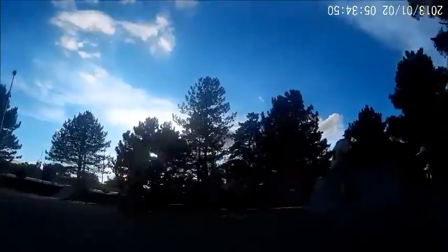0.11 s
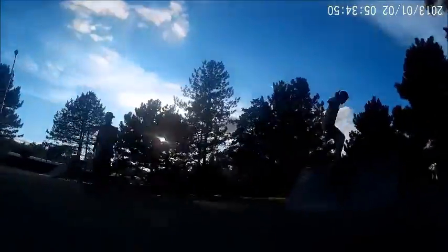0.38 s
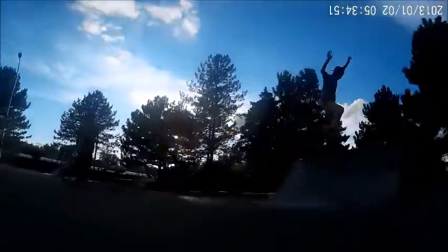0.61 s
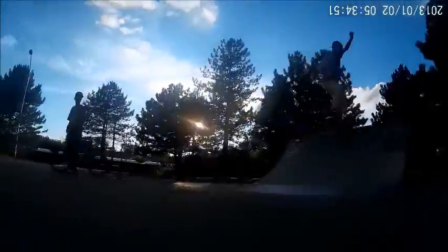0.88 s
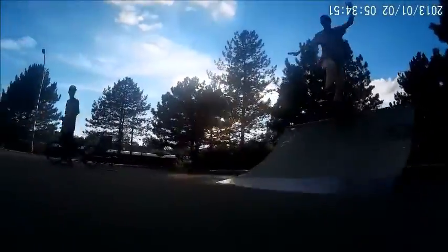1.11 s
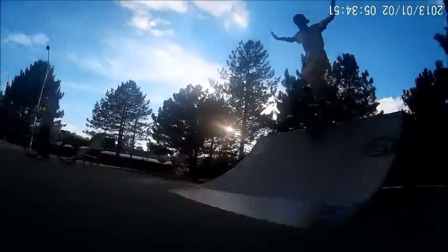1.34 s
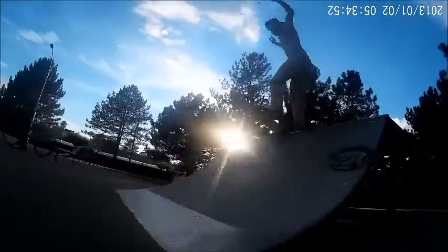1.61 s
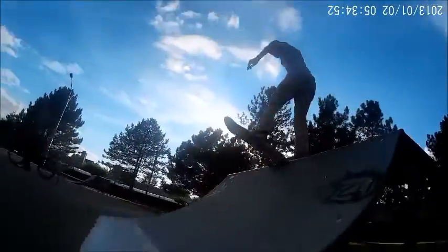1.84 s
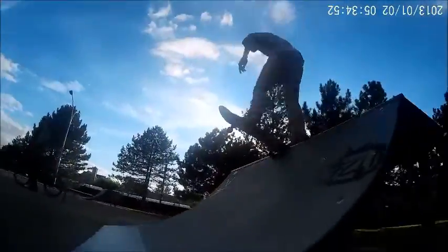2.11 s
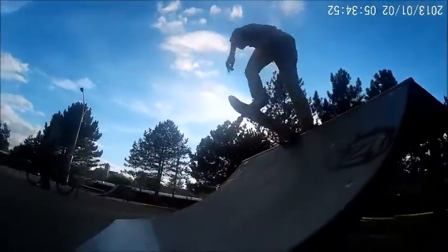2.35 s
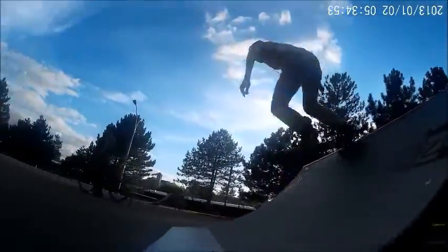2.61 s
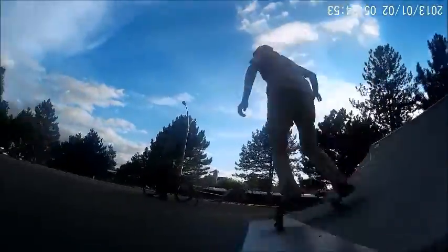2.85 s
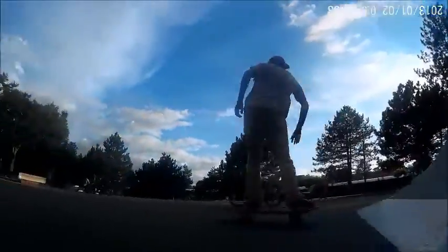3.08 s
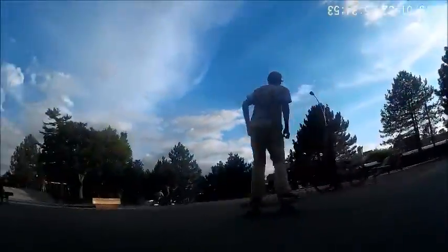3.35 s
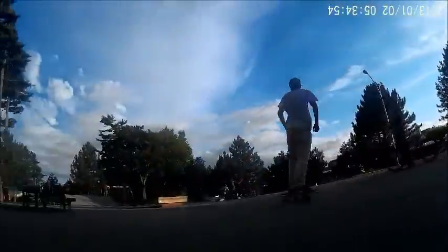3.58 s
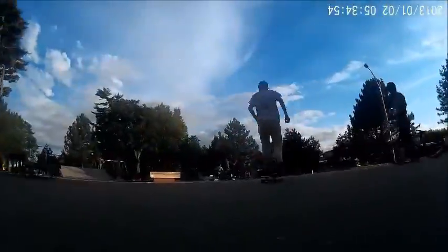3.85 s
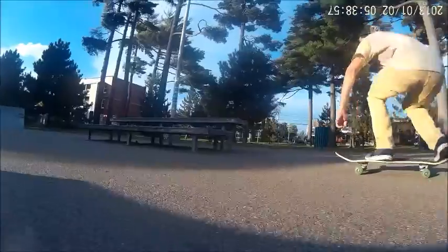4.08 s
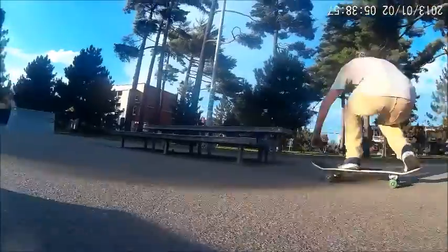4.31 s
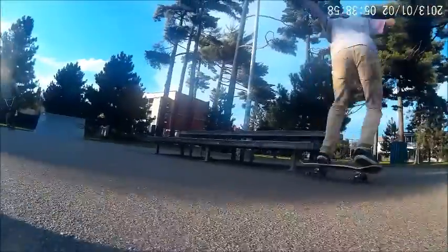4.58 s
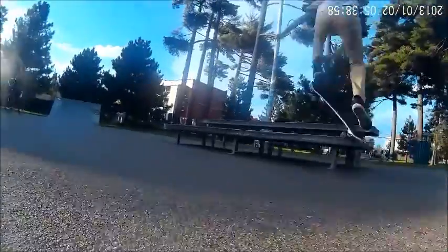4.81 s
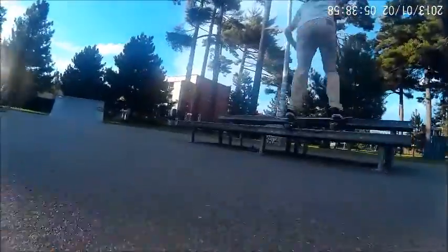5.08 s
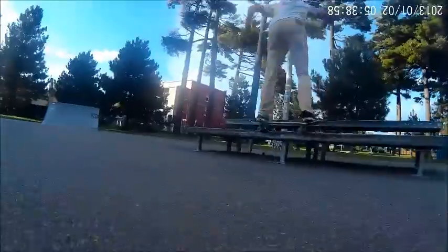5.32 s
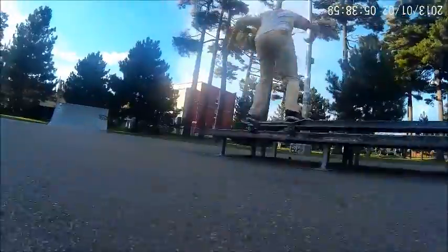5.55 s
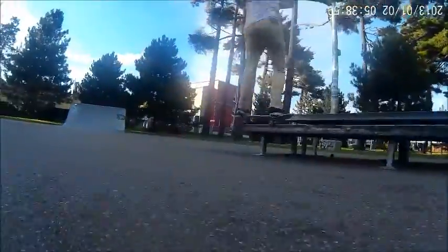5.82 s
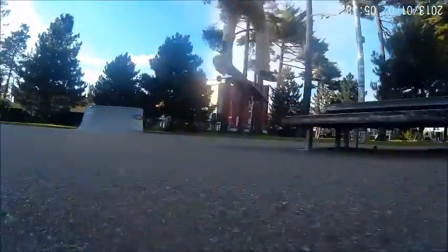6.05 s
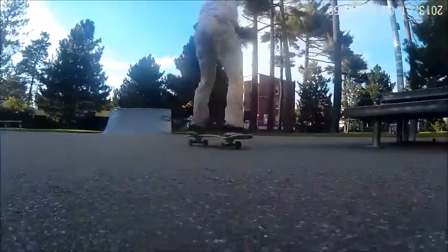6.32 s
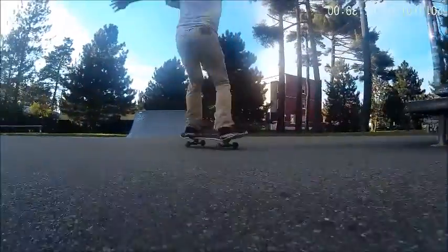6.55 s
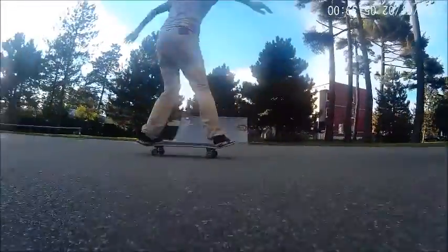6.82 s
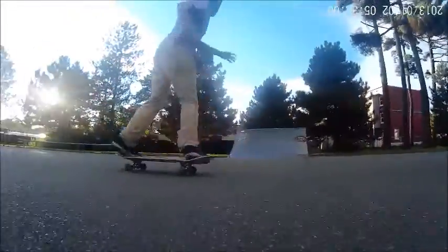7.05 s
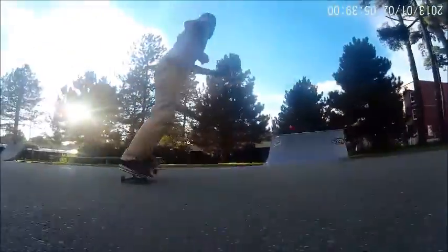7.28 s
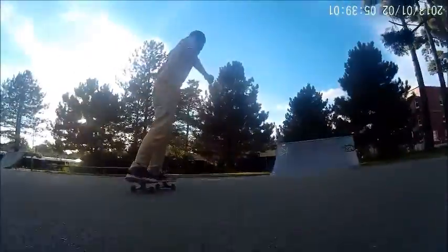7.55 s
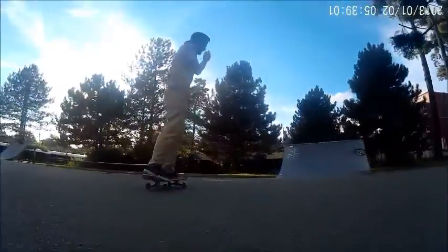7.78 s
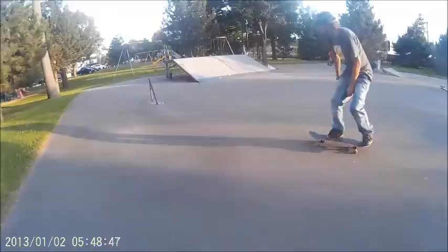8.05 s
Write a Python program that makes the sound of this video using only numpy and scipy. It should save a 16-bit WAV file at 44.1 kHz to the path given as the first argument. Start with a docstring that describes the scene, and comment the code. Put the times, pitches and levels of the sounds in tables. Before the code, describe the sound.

A small camera in a plastic housing gives everything a boxy, nasal ring, under steady hiss, light wind and a fuzzy low hum. From 0 to 1.2 s wheels roar over rough ground, strongest at first, with irregular clacks and thin singing bearings. A sharp crack at 1.24 s starts a harsher roll, peaking in a loud smack cluster at 1.6 s, then falling away by 1.8 s. Near quiet with a soft gust around 2 s. At 2.7 s light clatters resume over faint rolling, with one loud dry clack at 3.5 s and small rattles to 4.1 s. A second board rolls softly, pops at 4.75 s, and strikes a steel bench at 5.06 s with a short bright clank, another knock at 5.3 s. A faint metallic scrape lasts until 6.0 s. It lands at 6.37 s in a hard multiple slap, rolls quietly with occasional ticks, then gets louder from 7.8 s with loose clacks.

```python
"""Skateboards around a park

Wheels roll over asphalt and a ramp, decks and trucks clack down; one board lands on a steel bench, slides
along it and drops back to the ground. Rolls and clacks are noise in layers, shaped by a small camera's plastic
housing with a strong ring near 1.3 kHz. Decks, bearings and bench are noise-driven resonances.
Ticks are short band bursts; wind and a fuzzy hum lie over the hiss of the camera's preamp."""
import sys
import numpy as np
from scipy import signal
from scipy.io import wavfile

SR = 44100
rng = np.random.default_rng(int(sys.argv[2]) if len(sys.argv) > 2 else 0)


def wav_record(signal):
    """Record a signal, one row per channel, as 16-bit PCM in the file named by sys.argv[1]."""
    frames = np.transpose(np.atleast_2d(signal))
    bounded = np.clip(frames, -1, 1)
    # unit amplitude maps onto the largest positive 16-bit level
    quanta = np.round(bounded * 32767).astype(np.int16)
    wavfile.write(sys.argv[1], SR, quanta)


def convert_level_to_amplitude(level_db):
    """Map a level in decibels to its linear amplitude factor."""
    exponent = np.asarray(level_db, float) / 20
    return 10 ** exponent


N = 359856  # length in samples


def evened(x):
    """Bring a signal to rms 1."""
    return x / np.sqrt(np.mean(x ** 2) + 1e-20)


def curve(rows):
    """Read the columns of a table at every sample; silent (-150 dB) outside its times."""
    time_s, *columns = np.transpose(rows)
    return [np.interp(np.arange(N) / SR, time_s, column, -150, -150) for column in columns]


def read(points, hz):
    """Draw a tone curve through (Hz, dB) points, straight over log frequency."""
    point_hz, db = np.transpose(points)
    return np.interp(np.log(hz + 1), np.log(point_hz + 1), db)


def causal(db):
    """Turn a gain curve into a minimum-phase impulse response of energy 1, its sound as early as possible."""
    both_sides_db = np.concatenate([db, db[-2:0:-1]])
    log_gain = np.log(convert_level_to_amplitude(np.maximum(both_sides_db, -140)))
    minimum_phase = np.exp(np.conj(signal.hilbert(log_gain)))
    taps = np.fft.ifft(minimum_phase).real[:2048]
    return taps / np.linalg.norm(taps)


def noise():
    """White noise over the whole scene."""
    return rng.standard_normal(N)


def filtered(x, order, hz, kind="low"):
    """Butterworth filter, low-pass unless a band is asked for."""
    return signal.sosfilt(signal.butter(order, hz, kind, fs=SR, output="sos"), x)


def slow(hz):
    """Smooth random drift up to hz, rms 1."""
    return evened(filtered(noise(), 2, hz))


def resonate(x, hz, width_hz):
    """Ring one resonance."""
    return signal.lfilter(*signal.iirpeak(hz, hz / width_hz, SR), x)


def add(mix, start_s, sound):
    """Lay a sound into the mix, cut off at the end of the scene."""
    part = mix[round(start_s * SR):][:len(sound)]
    part += sound[:len(part)]


# Tone of the housing wall, relative: hz, level_db
WALL_TONE = [(100, -24), (250, -18), (600, -18.5), (1000, -18.5), (1350, -15), (1600, -18.5), (2100, -12),
             (2400, -29.5), (3400, -29.5), (4400, -32.5), (5300, -43), (6800, -49.5), (8500, -54.5),
             (13000, -73.5)]
# Resonances of the housing, with a few dips: pitch_hz, width_hz, above_wall_db
HOUSING_MODES = [(249, 166.5, 6.5), (486.3, 49, 6), (620, 220, 6), (833, 23.3, 3.5), (1325.3, 187, 11),
                 (1189, 300, 3), (1746.7, 84, 9), (1880.3, 72, 7.5), (1962.3, 193, 6.5), (2530, 460, 0.5),
                 (2763, 55, 3.5), (3096, 94, 5), (3511.1, 186, -11), (3519, 34, 12), (3700, 130, -2),
                 (3921, 62, 6.5), (4227, 38, 6.5), (4780, 80, 4.5), (7586, 170, 10.5), (9000, 240, 4.5),
                 (9525, 46, 11), (11000, 590, 4.5)]


def housing():
    """The way through the plastic to the microphone, split into five bands so each layer has its own level."""
    hz = np.fft.rfftfreq(8192, 1 / SR)
    db = read(WALL_TONE, hz)
    for pitch_hz, width_hz, above_wall_db in HOUSING_MODES:
        db = db + above_wall_db / (1 + (2 * (hz - pitch_hz) / width_hz) ** 2)
    edges_hz = 390, 850, 1600, 2350
    under = [-10 * np.log10(1 + (hz / edge) ** 12) for edge in edges_hz]
    over = [-10 * np.log10(1 + (edge / (hz + 1)) ** 12) for edge in edges_hz]
    main_ring = under[2] + over[1]
    low = under[1] + over[0]
    high, lowest = over[3], under[0]
    above_ring = under[3] + over[2]
    return [causal(db + band) for band in (main_ring, low, high, lowest, above_ring)]


# Wheels on the ground, one list per stretch of riding: time_s, roll_db, ground_coarseness_db
ROLL_STRETCHES = [
    [(0.0, -22, 1.5), (0.074, -27.5, 2), (0.338, -33, 0), (0.778, -31.5, -2), (0.988, -33, 1),
     (1.098, -31, 1.5), (1.228, -34.5, 2.5)],
    [(1.234, -29.5, 1.5), (1.454, -29, 2), (1.61, -22.5, -2), (1.74, -32.5, 2), (1.775, -41, 2)],
    [(1.785, -54.5, 0.5), (1.963, -58.5, 0.5), (2.125, -61, 0), (2.72, -61.5, -0.5)],
    [(2.76, -49.5, -0.5), (2.882, -56.5, 4), (3.074, -42.5, 0), (3.264, -45, -1.5), (3.49, -48, -1),
     (3.52, -31, -1), (3.57, -36, -1), (3.61, -39, -1), (3.64, -50, -5), (3.814, -52, 0.5),
     (3.95, -52.5, -1.5), (4.03, -42.5, 0), (4.105, -39.5, 1)],
    [(4.115, -47.5, -1.5), (4.2, -47.5, -2), (4.24, -52.5, -2.5), (4.39, -47.5, -2.5), (4.608, -42.5, 2),
     (4.784, -54.5, -2), (5.036, -51.5, 2), (5.228, -46.5, -2), (5.46, -48.5, -1.5), (5.78, -47.5, -0.5),
     (6.0, -52.5, -1.5)],
    [(6.02, -54, 0.5), (6.282, -54.5, 0.5), (6.452, -48, 0.5), (6.804, -48.5, 1), (7.018, -51, 2.5),
     (7.192, -38.5, 0), (7.292, -44, 2), (7.48, -49.5, 1.5), (7.694, -52, 0), (7.805, -45.5, -0.5)],
    [(7.82, -37.5, -7.5), (8.0, -37, 1.5), (8.112, -38, 4)],
    [(8.116, -40, 2), (8.16, -35.5, -2.5)],
]
# Board of each stretch, levels beside its roll: deck_rumble_db, grit_db, boom_db, rasp_db
BOARD_VOICES = [(-11.5, -22.5, -16, -9), (-14, -13.5, -22, -5.5), (-7.5, -25.5, -11, -8.5),
                (-9.5, -20.5, -11, -7), (-8.5, -19.5, -8, -6.5), (-8.5, -18, -8, -9),
                (-13.5, -22.5, -10.5, -21.5), (2.5, -20.5, -15.5, -14.5)]


def rolling():
    """Level of each layer in dB: all follow the roll and the ground, around the level of their board."""
    # rumble, grit, boom, rasp: dB for each dB of swell, and for each dB of coarseness
    per_swell, per_coarse = (0.738, 1.156, 0.593, 0.94), (0.3, 0.754, 0.1, 1.1983)
    roll_db, coarse_db = curve(sum(ROLL_STRETCHES, []))
    starts_s = [rows[0][0] for rows in ROLL_STRETCHES]
    stretch = np.searchsorted(starts_s, np.arange(N) / SR, "right") - 1
    usual_db = np.array([np.mean(rows, axis=0)[1] for rows in ROLL_STRETCHES])[stretch]
    swell_db = roll_db - usual_db
    levels_db = [roll_db]
    for voice_db, swell, coarse in zip(np.transpose(BOARD_VOICES), per_swell, per_coarse):
        levels_db.append(usual_db + voice_db[stretch] + swell * swell_db + coarse * coarse_db)
    return levels_db


def wheels(paths):
    """Stones of the asphalt knock the wheels: a lumpy noise patter with about 900 random knocks a second."""
    lumps_db = 1.44 * slow(hz=70) + 1.38 * slow(hz=8.8)
    knocked = rng.random(N) < 900 / SR
    size_db = 5.85 * np.minimum(rng.exponential(1, N), 4)
    stones = knocked * convert_level_to_amplitude(size_db) * rng.choice([-1, 1], N)
    patter = noise() + 0.158 * evened(stones)
    lump_shares = 0.639, 0.81, 1.48, 1.405, 0.9118
    out = np.zeros(N)
    for level_db, path, share in zip(rolling(), paths, lump_shares):
        own_waver_db = 1.243 * slow(hz=30)
        lumpy = evened(patter * convert_level_to_amplitude(share * lumps_db + own_waver_db))
        out += signal.oaconvolve(lumpy * convert_level_to_amplitude(level_db), path)[:N]
    return out


# Bending modes of a nearby deck while it rolls: start_s, end_s, pitch_hz, width_hz, beside_roll_db
DECK_DRONES = [(0, 1.23, 836, 119, -16.5), (2.9, 3.451, 478, 70, -12), (2.9, 3.452, 831, 80, -13.5),
               (4.114, 4.698, 620, 127, -8)]


def decks():
    """Rolling noise drones in the bending modes of a deck."""
    t = np.arange(N) / SR
    drone = np.zeros(N)
    for start_s, end_s, pitch_hz, width_hz, db in DECK_DRONES:
        rolls = (t > start_s) & (t < end_s)
        drone += convert_level_to_amplitude(db) * rolls * evened(resonate(noise(), pitch_hz, width_hz))
    return drone * convert_level_to_amplitude(rolling()[0] + 2.26 * slow(hz=30.1))


# Narrow bands of the nearest board's wheel bearings: pitch_hz, width_hz, level_db before the fader below
BEARING_BANDS = [(3110, 160, -66), (4292, 220, -69.5), (7470, 490, -80), (9465, 175, -84.5),
                 (10743, 1600, -80.5)]
# Fader of the bearing song: time_s, gain_db
BEARING_FADER = [(0, 3), (1.05, 0.5), (1.24, 8), (1.75, 5.5), (1.79, -24)]


def bearings():
    """Wheel bearings sing: noise in narrow resonances, each wavering by itself."""
    song = np.zeros(N)
    for pitch_hz, width_hz, db in BEARING_BANDS:
        band = resonate(resonate(noise(), pitch_hz, width_hz), pitch_hz, width_hz)
        song += convert_level_to_amplitude(db + 3 * slow(hz=12)) * evened(band)
    return song * convert_level_to_amplitude(curve(BEARING_FADER)[0])


# Gusts of wind: peak_s, level_db, time_to_fall_10_db_s
GUST_SWELLS = [(1.3, -56.5, 0.37), (2.7, -60.5, 0.32), (1.99, -49.5, 0.1646), (3.6, -54.5, 0.28),
               (4.06, -47.5, 0.13), (4.54, -55.5, 0.0079), (6.8, -53.5, 0.01)]


def blowing():
    """Wind gain: a steady breeze with gusts that rise and fall alike, added as power."""
    t = np.arange(N) / SR
    power = convert_level_to_amplitude(-68) ** 2  # breeze, dB
    for peak_s, db, fall_s in GUST_SWELLS:
        power = power + convert_level_to_amplitude(db - 10 * abs(t - peak_s) / fall_s) ** 2
    return np.sqrt(power)


# Fuzzy low hum: time_s, level_db
HUM_FADER = [(0.0, -55.5), (1.66, -62.5), (1.86, -78), (2.59, -78), (2.73, -48.5), (3.11, -71.5),
             (5.39, -55), (5.5, -66.5), (6.52, -51), (8.16, -55)]


def wind():
    """Lumpy low-passed pressure noise, a steady distant rumble, and a hum of noise in one broad resonance."""
    gusts = filtered(filtered(noise(), 1, [26, 48], "band"), 2, 90)
    rumble = filtered(noise(), 2, [35, 210], "band")
    rumble_db, hum_hz, hum_width_hz = -62.5, 133.7, 69.52
    hum = resonate(resonate(noise(), hum_hz, hum_width_hz), hum_hz, 2 * hum_width_hz)
    return blowing() * evened(gusts) + convert_level_to_amplitude(rumble_db) * evened(rumble) + convert_level_to_amplitude(curve(HUM_FADER)[0]) * evened(hum)


# Tone of the preamp hiss, relative: hz, level_db
HISS_TONE = [(200, -6), (1000, 0), (3000, 1), (6000, 0), (12000, -1), (15000, -1.5), (16500, -8)]


def preamp_hiss():
    """Electronic noise of the preamp, a little stronger at first."""
    hiss_db, stronger_by_db, stronger_until_s = -68.7, 1.8, 2.9
    tone = causal(read(HISS_TONE, np.fft.rfftfreq(8192, 1 / SR)))
    level_db = hiss_db + stronger_by_db * (np.arange(N) < stronger_until_s * SR)
    return convert_level_to_amplitude(level_db) * signal.oaconvolve(noise(), tone)[:N]


# Light first contacts, ticks of flung grit, short wheel squeaks, truck clatter and one dry click:
# start_s, peak_db, lowest_hz, highest_hz, length_s (fall to 1/e, before the band filter smears it)
TICK_EVENTS = [(0.033, -31.5, 2400, 4400, 0.0066), (0.108, -28, 2449, 4640, 0.00805),
               (0.437, -23, 1840, 2810, 0.00396), (0.437, -32, 2790, 4260, 0.002),
               (1.2354, -10.5, 800, 2150, 0.00122), (2.873, -59, 3580, 4100, 0.01063),
               (3.15, -46, 3792, 4990, 0.048), (3.185, -50.5, 3620, 5870, 0.00827),
               (3.506, -23.5, 487, 2083, 0.0068), (4.747, -42, 2300, 3100, 0.022),
               (5.053, -28, 900, 1595, 0.006), (5.062, -37, 2500, 5222, 0.055),
               (5.293, -42, 3736, 4060, 0.0273), (6.363, -29, 2200, 3600, 0.014),
               (8.049, -51.5, 4012, 4850, 0.011), (8.116, -37, 2000, 15570, 0.0000383)]


def ticks():
    """Short noise bursts in one band with a quick start: tiny contacts, and one dry click."""
    out, t = np.zeros(N), np.arange(SR // 8) / SR
    for start_s, peak_db, lowest_hz, highest_hz, length_s in TICK_EVENTS:
        grain = rng.standard_normal(len(t)) * np.exp(-(t / length_s) ** 2)
        burst = filtered(grain, 4, [lowest_hz, highest_hz], "band")
        add(out, start_s, convert_level_to_amplitude(peak_db) * burst / abs(burst).max())
    return out


# Clacks of wheels, tail and trucks: blow_s, main_layer_peak_db, weight_db, hardness_db, t60_s
CLACK_EVENTS = [(0.1119, -24.5, -10.5, 9, 0.036), (0.1919, -18, -4, 2, 0.0436),
                (0.3603, -20, -12.5, -11.5, 0.032), (0.4945, -30, 0.5, -13, 0.036),
                (0.5526, -20, -19.5, -13.5, 0.144), (0.7817, -33.5, -2.5, -4.5, 0.077),
                (0.8137, -18.5, -11.5, -1, 0.024), (1.002, -20, -13, -7.5, 0.058),
                (1.048, -22, -8.5, 6, 0.185), (1.2354, -17, -11, 9, 0.167),
                (1.2461, -16.5, -27.5, 8.5, 0.062), (1.2781, -20.5, -26, 12, 0.072),
                (1.555, -17, -14.5, -6.5, 0.03), (1.572, -20.5, -20.5, -5, 0.051),
                (1.6005, -9.5, -18, 6, 0.0445), (1.6261, -18.5, -20, -2, 0.04),
                (1.6476, -21.5, -20, -2.5, 0.05), (1.7486, -19, -17.5, 9.5, 0.0695),
                (2.6952, -32.5, -8.5, 1, 0.0594), (2.7318, -25.5, -4, 7.5, 0.034),
                (2.738, -24, -5, 6.5, 0.04), (2.7447, -29, -2.5, -15, 0.053), (2.8692, -35, -3, 1.5, 0.174),
                (2.9429, -31.5, -4.5, 3.5, 0.073), (3.0044, -31, -2, 6, 0.04),
                (3.0175, -34.5, -13.5, 9, 0.042), (3.1524, -30, -7, 4.5, 0.143),
                (3.5116, -8, -23, -14, 0.03), (3.5568, -33.5, -21.5, 1, 0.08),
                (3.6594, -32.5, -16, -10, 0.034), (3.6738, -28, -5, -1.5, 0.171),
                (3.7686, -30, -14, -1.5, 0.033), (4.0188, -33, -23, -7, 0.069),
                (4.057, -31, -20.5, -10, 0.07), (4.0925, -30, -11, -1, 0.041),
                (4.1846, -37, 0, -5.5, 0.063), (4.443, -33.5, -6, -3, 0.05),
                (4.497, -34.5, -15.5, -5, 0.065), (4.5487, -33.5, -3.5, 6.5, 0.038),
                (4.5992, -30.5, -11.5, 1.5, 0.037), (4.6427, -30.5, -14.5, -7.5, 0.04),
                (4.668, -33, -13.5, -5, 0.051), (4.7262, -36, -24, -10, 0.048),
                (4.7447, -26, -20.5, 5, 0.1007), (4.753, -24, -18, 2, 0.104), (5.0615, -15, -11, 4, 0.06),
                (5.0735, -22, -7.5, 15.5, 0.0992), (5.0892, -22.5, -18, 12, 0.054),
                (5.1056, -30.5, -1.5, 16, 0.126), (5.2894, -26.5, -10, 4.5, 0.077),
                (5.3454, -33.5, -3, 7, 0.095), (5.3732, -31.5, -6, 1.5, 0.091),
                (6.262, -32.5, -11, 5, 0.065), (6.294, -40, -9, 9.5, 0.077), (6.363, -14.5, -7, 4, 0.0263),
                (6.3675, -13, -7, 3.5, 0.04), (6.3814, -15.5, -3.5, -2.5, 0.033),
                (6.3895, -18, -9, -3.5, 0.067), (6.7804, -28, -16.5, 2.5, 0.02),
                (6.791, -31.5, -8, 5.5, 0.072), (7.1358, -29.5, -15, -6, 0.1982),
                (7.1776, -30, -6, -0.5, 0.088), (7.2469, -29, -22, -6.5, 0.077),
                (7.409, -36, -15, 7, 0.027), (7.8251, -27, -5.5, 3, 0.092),
                (7.848, -28.5, -10.5, 1.5, 0.088), (7.9051, -22, -18, -4, 0.076),
                (7.9435, -30.5, -15.5, 3, 0.1), (8.0013, -22.5, -21, -9, 0.167),
                (8.054, -24, -12.5, -1, 0.05)]


def clacks(paths):
    """Each blow is noise that swells for 1 ms, rattles until 5 ms and dies away; harder ones snap and crack more."""
    out, t = np.zeros(N), np.arange(SR // 4) / SR
    for blow_s, peak_db, thud_db, hard_db, t60_s in CLACK_EVENTS:
        snap_db, crack_db = -20.5 + hard_db, -7 + 0.383 * hard_db
        swell = np.minimum(t / 0.00103, 1)
        fall = convert_level_to_amplitude(-60 * np.maximum(t - 0.005, 0) / t60_s)
        blow = rng.standard_normal(len(t)) * fall * swell
        clack, thud, snap, boom, crack = (evened(signal.oaconvolve(blow, path)) for path in paths)
        weight = convert_level_to_amplitude(thud_db) * (0.883 * thud + 0.409 * boom)
        sound = clack + weight + convert_level_to_amplitude(snap_db) * snap + convert_level_to_amplitude(crack_db) * crack
        add(out, blow_s - 0.002, convert_level_to_amplitude(peak_db) * sound / abs(clack).max())  # the swell starts just before the blow
    return out


# Modes of the steel bench: pitch_hz, first_blow_db, second_blow_db, third_blow_db, t60_s ringing free
BENCH_MODES = [(1701, -14, -18, -14, .12), (2019, -10, -14, -22, .12), (2080, -20, -24, -14, .2),
               (2148, -8, -20, -10, .1), (2234, -2, -12, -10, .12), (2330, -18, -30, -16, .12),
               (2632, -26, -30, -18, .15), (2750, -24, -20, -20, .12), (2940, -26, -30, -22, .12),
               (3499, -32, -22, -34, .1), (3967, -26, -17, -20, .14), (4974, -32, -21, -34, .08),
               (6665, -46, -32, -46, .1), (7671, -42, -20, -36, .15), (7806, -42, -27, -36, .17),
               (7940, -46, -29, -42, .14)]
# Truck blows on the steel: start_s, drive_db, chatter_s (before the steel rings free)
TRUCK_BLOWS = [(5.064, -30, 0.0117), (5.09, -31, .014), (5.289, -33, 0.02)]
# Board grinding along the bench: time_s, level_db
SLIDE_FADER = [(5.1, -53), (5.3, -65.5), (5.6, -59.5), (5.9, -62), (6.02, -77)]


def bench():
    """Trucks chatter on the steel at different spots; then the slide stirs its low modes, damped by the board."""
    out, t = np.zeros(N), np.arange(SR // 3) / SR
    pitch_hz, *spots_db, t60_s = np.transpose(BENCH_MODES)[:, :, None]
    tones = np.sin(2 * np.pi * pitch_hz * t)
    for (start_s, drive_db, chatter_s), spot_db in zip(TRUCK_BLOWS, spots_db):
        knocks = rng.standard_normal(len(t)) * (t < chatter_s) / np.sqrt(chatter_s * SR)
        free_ring = (convert_level_to_amplitude(spot_db - 60 * t / t60_s) * tones).sum(0)
        add(out, start_s, convert_level_to_amplitude(drive_db) * signal.oaconvolve(knocks, free_ring))
    damped_db = 1.21 * spots_db[-1] - 60 * t / (0.9 * t60_s)
    damped_ring = (convert_level_to_amplitude(damped_db) * tones * (pitch_hz < 3200)).sum(0)
    scrape = noise() * convert_level_to_amplitude(curve(SLIDE_FADER)[0] + 2.7 * slow(hz=24.8))
    return out + signal.oaconvolve(scrape, damped_ring / np.linalg.norm(damped_ring))[:N]


def scene():
    """Everything that reaches the microphone, as one channel."""
    paths = housing()
    riding = wheels(paths) + decks() + bearings()
    return (riding + wind() + ticks() + clacks(paths) + bench())[None]


def band_limit(x):
    """A steep low-pass at the top of the band."""
    return signal.sosfilt(signal.butter(12, 15690, fs=SR, output="sos"), x)


def record(dry):
    """The camera lays its preamp hiss over the scene."""
    mix = dry + preamp_hiss()
    return band_limit(mix)


dry = scene()
out = record(dry)
wav_record(out)
```